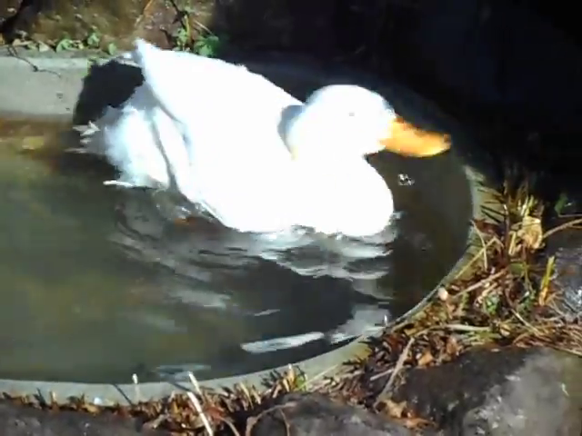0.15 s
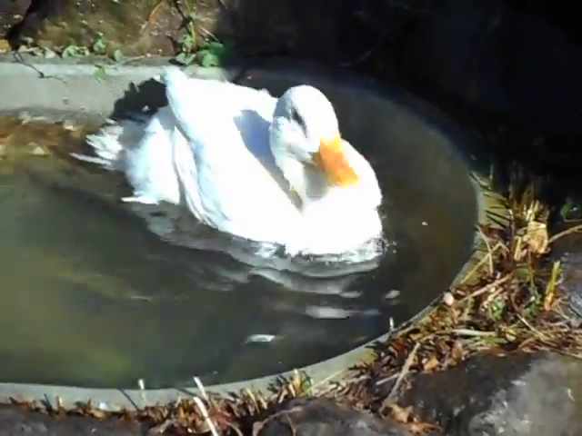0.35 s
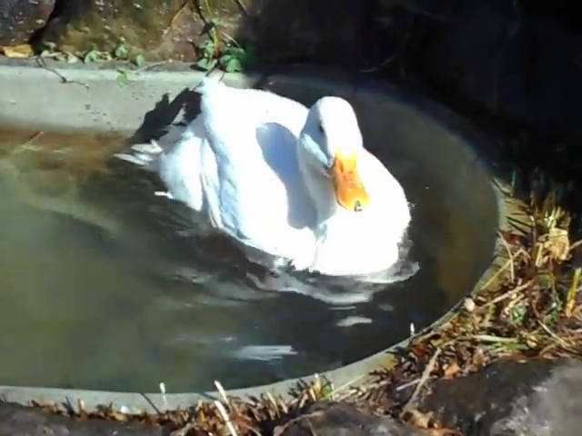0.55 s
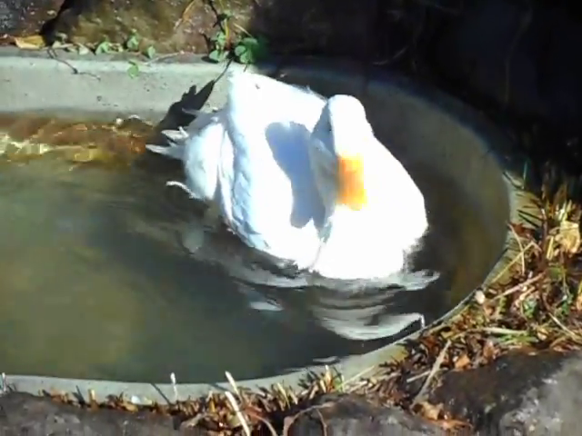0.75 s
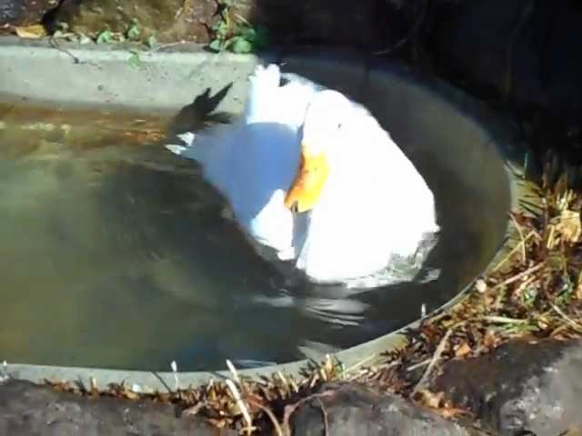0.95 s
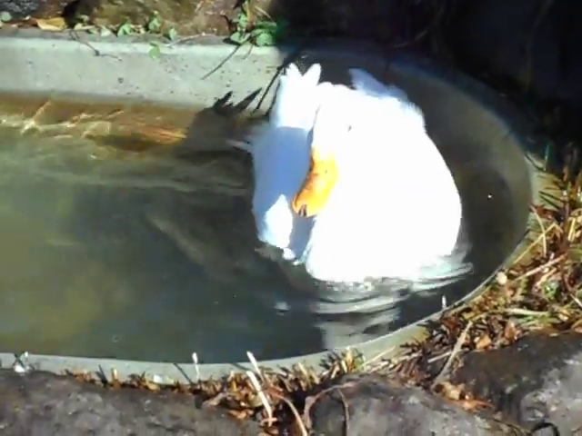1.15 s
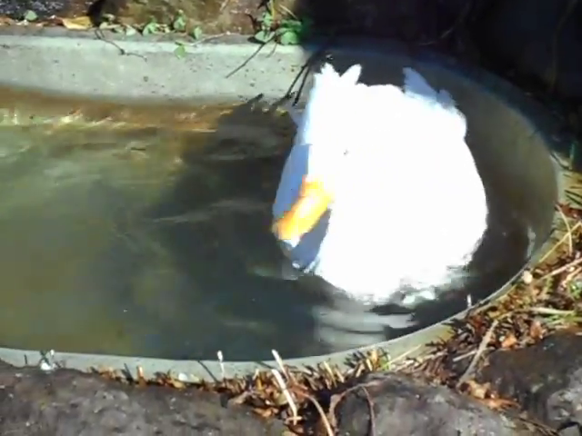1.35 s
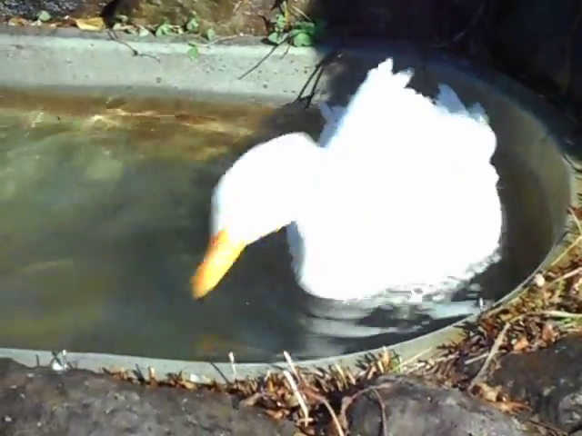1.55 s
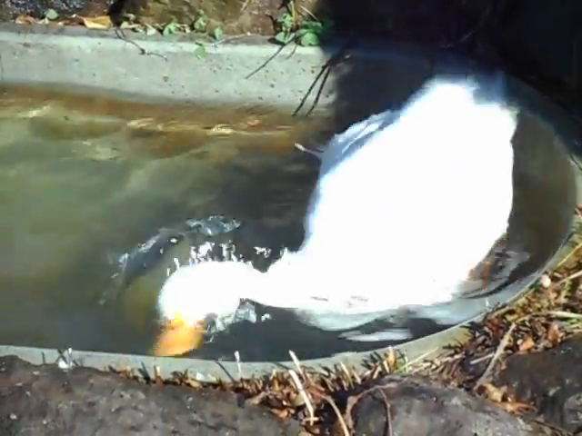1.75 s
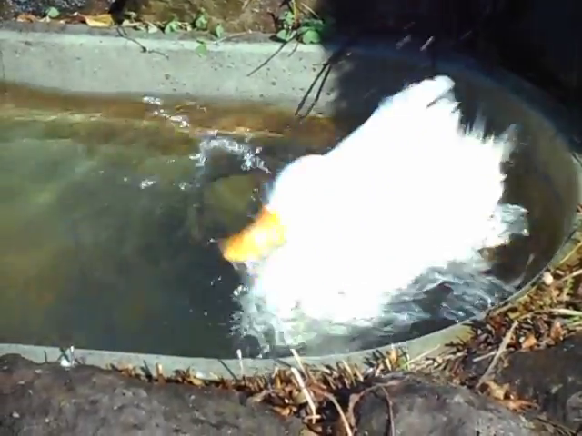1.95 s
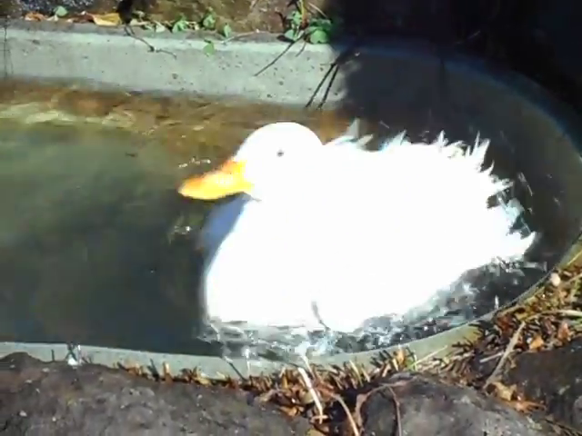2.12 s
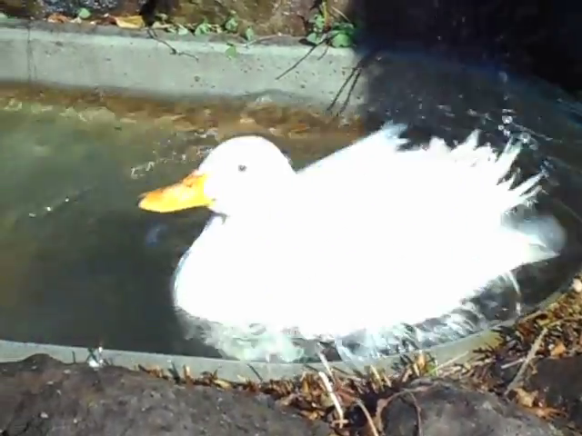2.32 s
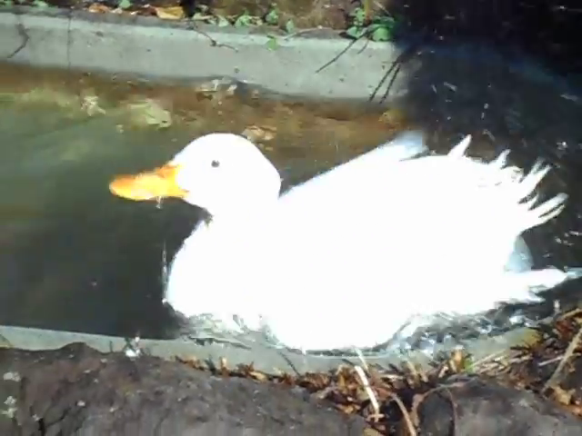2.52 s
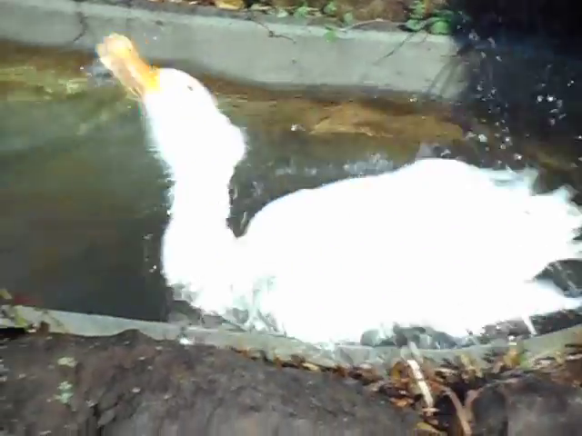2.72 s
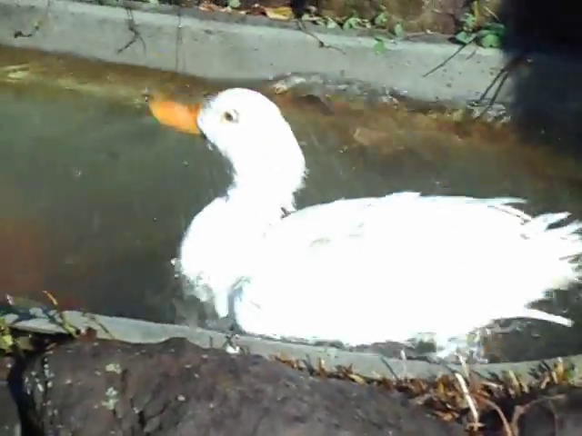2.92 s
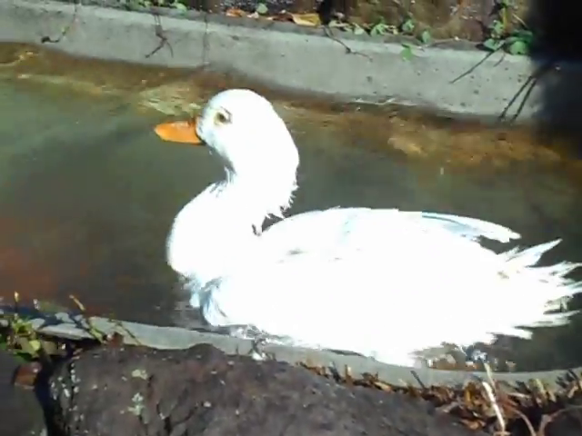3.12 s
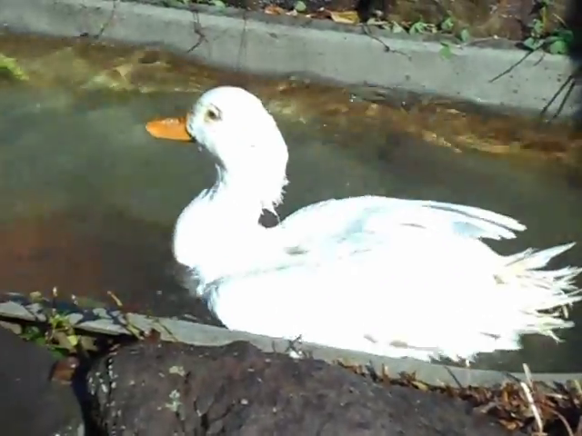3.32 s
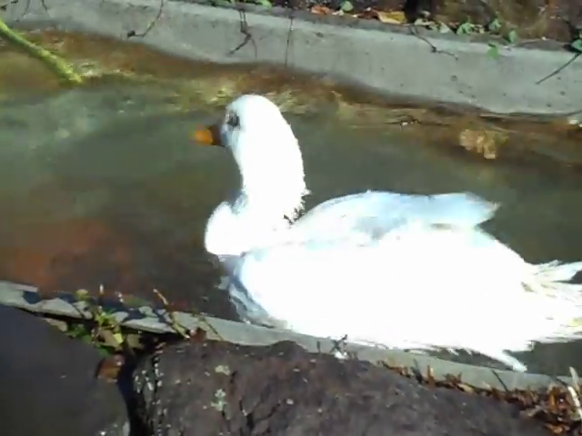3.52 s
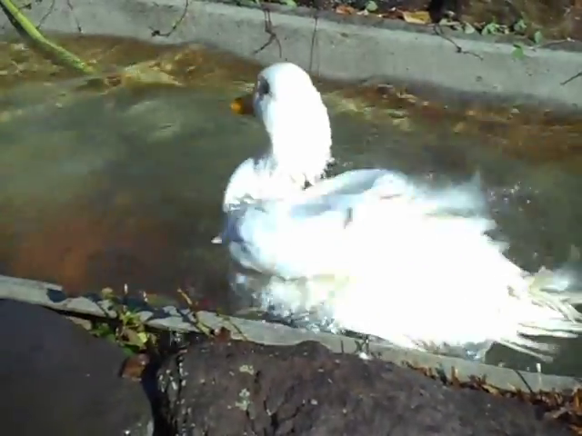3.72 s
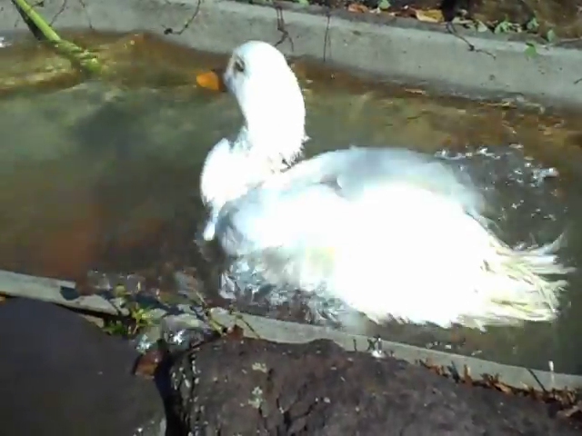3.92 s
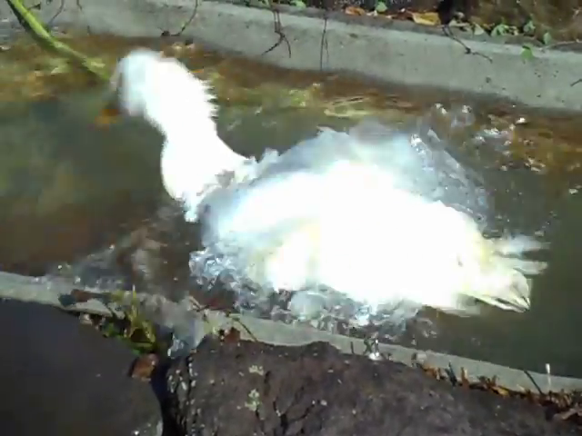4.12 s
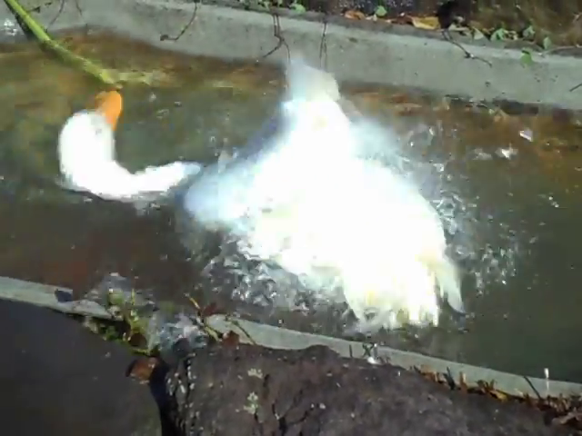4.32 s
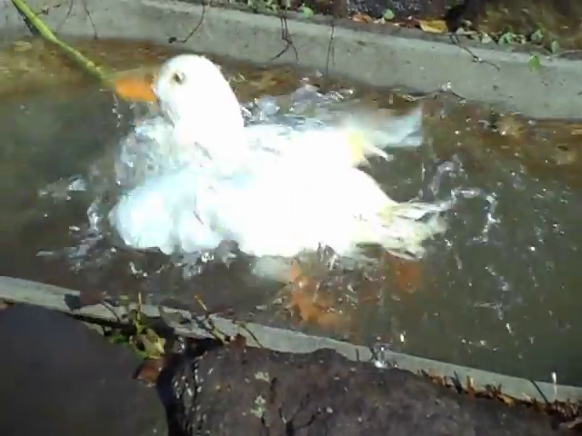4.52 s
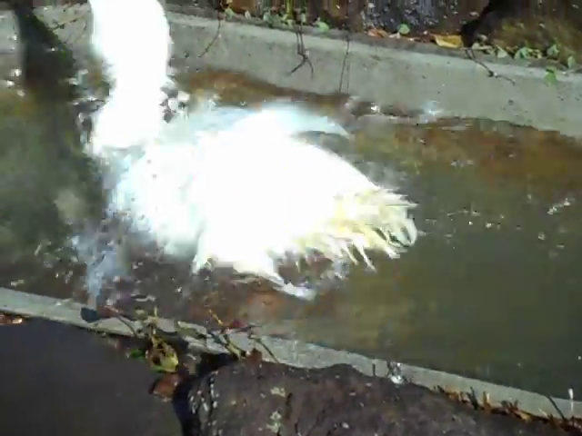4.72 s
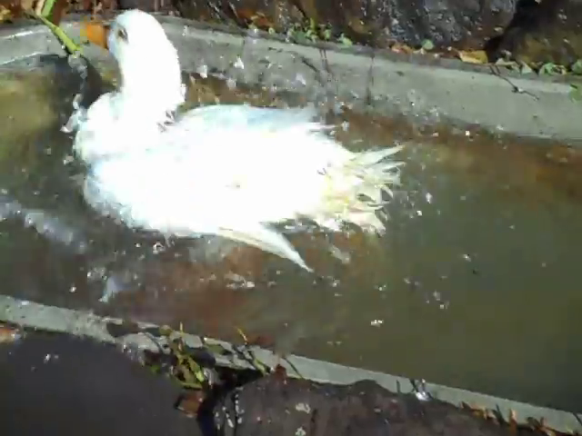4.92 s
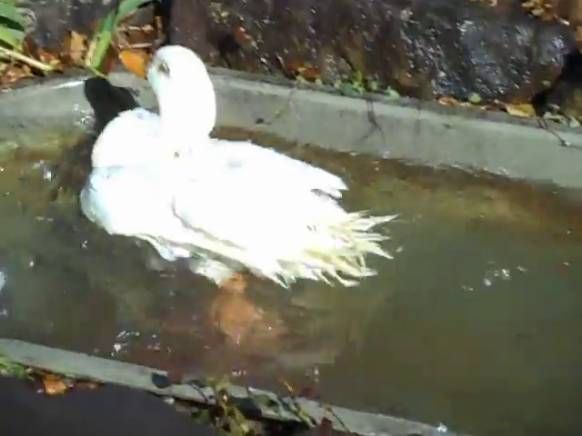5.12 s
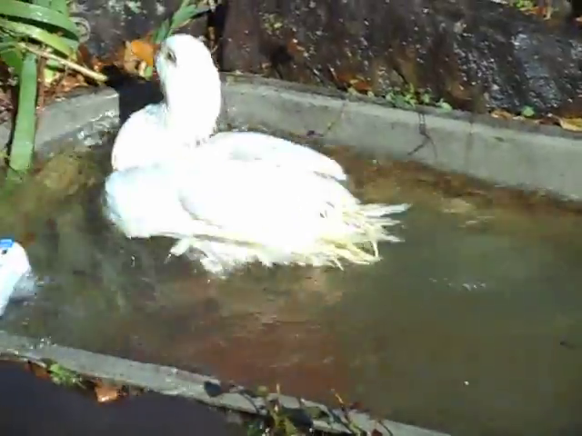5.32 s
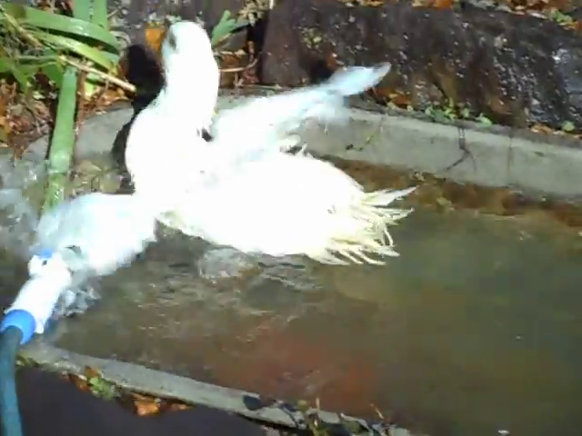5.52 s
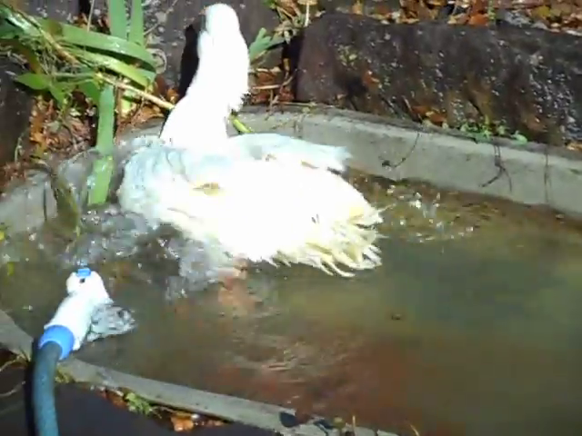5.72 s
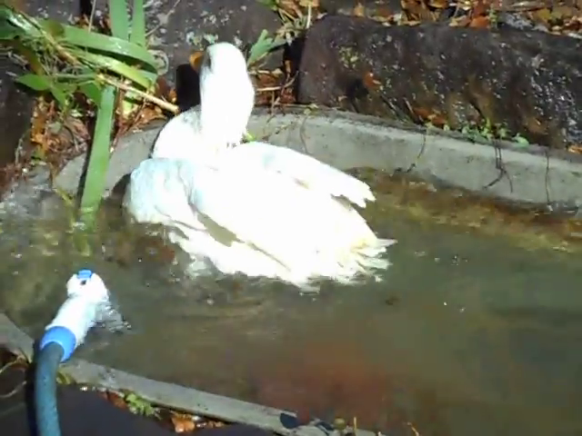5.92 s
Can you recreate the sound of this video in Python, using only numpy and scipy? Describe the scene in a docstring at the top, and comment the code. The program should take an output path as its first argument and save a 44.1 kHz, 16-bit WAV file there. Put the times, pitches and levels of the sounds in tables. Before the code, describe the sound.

Two bursts of crisp wing splashes and gurgling water, the second longer and busier, with a trickling hose and small bird chirps behind.

```python
"""Splashes, plops and bright ticks burst out in two bouts over soft garden air, as a duck bathes in a
small concrete pond: it dips, shakes and beats its wings. Trapped air rings as gliding sine bubbles,
thrown drops tick as short clicks with a puff of noise, and churned water is swarms of bubbles and hiss.
Noise and tiny bubbles make the air and a trickling hose; resonant noise makes far traffic and wind;
gliding tones and narrow noise make small birds. Scattered echoes return from the pond's rim and rocks."""
import sys
import numpy as np
from scipy import signal
from scipy.io import wavfile
from scipy.ndimage import uniform_filter1d

SR = 44100
rng = np.random.default_rng(int(sys.argv[2]) if len(sys.argv) > 2 else 0)


def rack_gain(trim_db):
    """Turn a fader trim in dB into the linear factor to multiply a signal by."""
    fader = np.asarray(trim_db, float)
    return 10 ** (fader / 20)


def master_out(mix):
    """Clip the mix to full scale and print it as 16-bit PCM to the path in sys.argv[1]."""
    frames = np.transpose(np.atleast_2d(mix))
    ceiling = np.clip(frames, -1, 1)
    pcm = np.round(ceiling * 32767).astype(np.int16)
    wavfile.write(sys.argv[1], SR, pcm)


N = 267466  # length [samples]

# colour of the garden air, also of small bubbles in the hose's trickle: (frequency [Hz], relative level [dB])
GARDEN_COLOUR = [(12, -46), (20, -45), (120, -11.5), (161, -8), (227, -6.5), (273, -8.5), (428, -6),
                 (557, -9), (745, -5.5), (1080, -8.5), (1930, -9), (3440, -10), (3730, -12), (8230, -21.5),
                 (11000, -36), (14300, -79), (22000, -120)]
# colour of spray and fine droplets: (frequency [Hz], relative level [dB])
SPRAY_COLOUR = [(2500, 4), (4500, 3), (6000, 3), (8000, 6.5), (10000, -7), (11000, -39)]


def evened(x):
    """Scales a sound to rms 1."""
    return x / np.sqrt(np.mean(x ** 2) + 1e-20)


def curve(rows, axis=1):
    """One column of a time table at every sample; -120 outside the listed times."""
    rows = np.array(rows)
    return np.interp(np.arange(N) / SR, rows[:, 0], rows[:, axis], -120, -120)


def read(points, hz):
    """Reads a colour table at the given frequencies, along a logarithmic scale."""
    f, value = np.transpose(points)
    return np.interp(np.log(hz + 1), np.log(f + 1), value)


def add(mix, s, sound):
    """Mixes a sound in from time s [s]."""
    part = mix[round(s * SR):][:len(sound)]
    part += sound[:len(part)]


def above(x, hz):
    """Weakens what lies below hz."""
    return signal.sosfilt(signal.butter(3, hz, "high", fs=SR, output="sos"), x)


def resonate(x, hz, width):
    """A resonance of gain 1: shifts the pitch hz (it may glide) down to zero, smooths, shifts back."""
    turn = np.exp(2j * np.pi * np.cumsum(hz * np.ones(len(x))) / SR)
    r = np.exp(-np.pi * width / SR)
    smooth = signal.lfilter([1 - r], [1, -r], x / turn + 1e-18)
    return 2 * (turn * smooth).real


def hiss(colour, size, patchy_db):
    """Noise of a given colour, with random louder and softer patches in time and frequency."""
    frames, hz = 4 * N // size + 5, np.fft.rfftfreq(size, 1 / SR)
    real, imaginary, patches = rng.standard_normal((frames, len(hz), 3)).T
    for axis in (0, 1):
        patches = uniform_filter1d(patches, size=8, axis=axis)
    gain = rack_gain(read(colour, hz)[:, None] + patchy_db * evened(patches))
    noise = signal.istft((real + 1j * imaginary) * gain, nperseg=size, noverlap=3 * size // 4)[1]
    return evened(noise[:N])


def bubble(hz, swell_ms, fade_ms, glide, phase):
    """Trapped air rings: a sine swells, fades and climbs by glide [octaves/s]; returns lead [s], sound."""
    swell, fade = max(swell_ms, .1) / 1000, max(fade_ms, .1) / 1000
    t = np.arange(-2 * swell, 6 * fade, 1 / SR)  # the peak is at zero
    rise = np.exp(-(t / swell) ** 2)
    fall = 2 / (np.exp(t / fade * 1.98) + np.exp(-t / fade * 0.35))
    turns = np.cumsum(hz * 2 ** (glide * t)) / SR
    return 2 * swell, np.where(t < 0, rise, fall) * np.cos(2 * np.pi * (turns + phase))


def swarm(colour, lo_hz, hi_hz, per_s, cycles, spread_db, count=24):
    """Countless small bubbles at random times, of random size and one of count pitches; a few are large."""
    size = rack_gain(spread_db * np.minimum(rng.exponential(1, N), 4))
    size = size * (rng.random(N) < per_s / SR)
    kind, out = rng.integers(0, count, N), np.zeros(N)
    for k, hz in enumerate(np.geomspace(lo_hz, hi_hz, count)):
        fade_ms = 1000 * cycles / hz * rng.uniform(0.3, 2.1)
        grain = bubble(hz, 0.24 * fade_ms, fade_ms, 25, rng.random())[1]
        out += signal.oaconvolve(size * (kind == k), grain * rack_gain(read(colour, hz)))[:N]
    return evened(above(out, 0.69 * lo_hz))


def hose_trickle():
    """A hose trickles into the pond: sparse small bubbles, with a few sharper droplets."""
    small = 0.25 * swarm(GARDEN_COLOUR, 970, 7500, 150, 1.6, 1.3)
    droplets = 0.074 * swarm(SPRAY_COLOUR, 5200, 10600, 30, 3.6, 4.5, count=8)
    return small + droplets


def garden():
    """Soft outdoor air is coloured noise; it and the trickle rise and fall together."""
    # level of air and trickle, ahead of their weights: (time [s], level [dB])
    garden_level = [(0, -57.5), (.5, -57), (1.5, -58.5), (3.3, -57), (5.4, -58), (6.07, -56)]
    air = 1.03 * hiss(GARDEN_COLOUR, size=1024, patchy_db=1.85)
    return rack_gain(curve(garden_level)) * (air + hose_trickle())


def traffic():
    """Far traffic drones: noise passes twice through each of a few low resonances."""
    # level of the drone, ahead of the final 0.58: (time [s], level [dB])
    drone_level = [(0, -63), (.67, -55.5), (1.08, -60.5), (2.16, -61.5), (2.4, -52.5), (2.77, -57),
                   (3.0, -60), (4.05, -70), (4.75, -63), (6.07, -67)]
    # resonances of the drone: (frequency [Hz], width of one pass [Hz], relative level [dB])
    resonances = [(188.6, 56, -3), (222, 45, -3.5), (338.4, 129, -8)]
    noise, drone = rng.standard_normal(N), np.zeros(N)
    for hz, width, db in resonances:
        drone += rack_gain(db) * resonate(resonate(noise, hz, width), hz, width)
    return 0.58 * rack_gain(curve(drone_level)) * evened(drone)


def wind():
    """A light breeze on the microphone: low noise at a steady level, with soft puffs."""
    # puffs, ahead of the final 0.43: (time of peak [s], peak level [dB])
    puffs = [(.35, -65), (.54, -75), (5.32, -61), (5.7, -59), (5.96, -61)]
    puff_s = 0.045  # from a puff's peak to 1/e of it [s]
    t = np.arange(N) / SR
    level = rack_gain(-72.5) + sum(rack_gain(db) * np.exp(-((t - s) / puff_s) ** 2) for s, db in puffs)
    rumble = resonate(resonate(rng.standard_normal(N), 56, 87), 56, 87)
    return 0.43 * level * evened(rumble)


def bird_chips():
    """Short high notes of distant birds, blurred by foliage: a drooping sine plus narrow noise."""
    # notes, ahead of their shaping: (start [s], level [dB], pitch [Hz]); each starts 3 % above its pitch
    chips = [(0.046, -55.5, 5000), (0.69, -65, 4840), (0.949, -56, 4990), (1.834, -55, 4900),
             (3.4012, -62.5, 4940), (4.8798, -41, 4700), (5.3053, -63, 4830), (5.84, -44, 4760)]
    out, t = np.zeros(N), np.arange(4000) / SR
    envelope = np.minimum(t / 0.011, 1) * np.exp(-(t / 0.036) ** 2)
    for s, db, hz in chips:
        pitch = hz * (1.03 - 1.23 * t)
        tone = .8 * np.sin(2 * np.pi * np.cumsum(pitch) / SR)
        blur = .3 * evened(resonate(rng.standard_normal(4000), pitch, 220))
        add(out, s, rack_gain(db) * (tone + blur) * envelope)
    return out


def bird_whistles():
    """Longer hoarse calls, blurred by foliage: narrow noise follows a gliding pitch."""
    # one table for each call: (time [s], pitch [Hz], level [dB])
    calls = [
        [(.18, 4080, -65), (.24, 4180, -63), (.3, 3800, -66), (.34, 3700, -62), (.43, 3650, -64),
         (.53, 3550, -61), (.62, 3450, -65)],
        [(.78, 4500, -66), (.795, 4200, -58), (.81, 3200, -59), (.822, 2900, -59), (.84, 2800, -59),
         (.855, 2750, -72)],
    ]
    out = np.zeros(N)
    for rows in calls:
        pitch = np.interp(np.arange(N) / SR, *np.transpose(rows)[:2])
        fuzz = resonate(resonate(rng.standard_normal(N), pitch, 370), pitch, 370)
        # an unsteady voice
        rasp = rack_gain(3 * evened(uniform_filter1d(rng.standard_normal(N), size=400)))
        out += rack_gain(curve(rows, axis=2)) * evened(fuzz * rasp)
    return out


def ticks():
    """Drops and wing tips strike the surface: a sharp broad click inside a very short puff of spray."""
    # separately audible strikes; the click is centred 1 ms after the time:
    # (time [s], click level [dB], colour [Hz])
    strikes = [(.353, -45, 6070), (.88, -41.5, 7060), (1.628, -41, 5600), (1.856, -26.5, 8000),
               (1.874, -16.5, 6180), (1.929, -31, 5630), (1.992, -29, 4880), (2.051, -30, 5270),
               (2.086, -26, 6320), (2.208, -38, 6800), (2.255, -33, 5220), (2.269, -25, 6100),
               (2.287, -28.5, 5640), (2.323, -19, 6220), (2.388, -14.5, 5830), (2.462, -27, 5640),
               (2.583, -34, 5740), (2.623, -31, 6510), (2.688, -34.5, 6910), (2.749, -38, 5020),
               (2.778, -29, 5140), (2.803, -17, 5460), (2.848, -29, 4640), (2.913, -29.5, 4490),
               (3, -38.5, 7440), (3.103, -43, 7460), (3.198, -40.5, 6100), (3.74, -36, 5770),
               (3.76, -17.5, 6800), (3.877, -26.5, 5600), (3.994, -28, 5370), (4.047, -32, 4430),
               (4.182, -26, 6700), (4.288, -25, 5460), (4.401, -31, 4830), (4.494, -22, 7700),
               (4.514, -36, 8500), (4.554, -25, 4500), (4.596, -35, 5750), (4.639, -23.5, 5270),
               (4.663, -20.5, 5000), (4.723, -27, 4740), (4.74, -31, 5840), (4.803, -28, 5110),
               (4.931, -34, 6340), (4.97, -28, 7200), (5.063, -28, 6550), (5.214, -31, 4570),
               (5.383, -39, 8250), (5.511, -35, 5500), (5.568, -36, 4670), (5.589, -32, 4560),
               (5.685, -38, 5340), (5.718, -25.5, 6070), (5.827, -35, 5020), (5.885, -28, 6700),
               (5.909, -23.5, 7650), (5.929, -30, 8000)]
    click_cycles = 1.22  # from the click's centre to 1/e of its height [cycles]
    out, t = np.zeros(N), np.arange(-100, 500) / SR
    for s, db, hz in strikes:
        noise = rng.standard_normal(600)
        click = np.exp(-(t * hz / click_cycles) ** 2) * np.cos(2 * np.pi * hz * t + noise[0])
        puff = np.diff(noise, prepend=0) * np.exp(np.minimum(t / 0.00066, -t / 0.0016))
        spray = 0.18 * (resonate(puff, hz, 1700) + 0.34 * puff)
        add(out, s - .0013, rack_gain(db) * (click + spray))
    return above(out, 1900)  # a drop is too small to push any bass


def basin(x):
    """The concrete rim and rocks send back a short, sparse scatter of fading echoes."""
    at = np.arange(60, 6000, 22) + rng.integers(0, 22, 270)  # delays [samples]
    taps = np.zeros(6100)
    # the echoes fall by 60 dB in 0.057 s
    taps[at] = rng.choice([-1., 1.], len(at)) * rack_gain(-60 * at / SR / 0.057)
    return signal.oaconvolve(x, taps / np.linalg.norm(taps))[:N]


def sloshing(axis):
    """Agitation of gurgle (axis 1) or spray (axis 2): a slow stir plus sloshes that rise fast and settle."""
    # sheets of water thrown up and falling back, and a soft rustle before the first bout,
    # levels ahead of shaping and mixing:
    # (time [s], gurgle level [dB], spray level [dB], settling time [ms])
    sloshes = [(0.461, -55, -55, 41), (1.629, -55, -61.5, 134), (1.857, -36.5, -48.5, 99),
               (1.929, -38, -50, 66), (1.98, -35, -51, 27), (2.05, -41, -48, 69), (2.14, -49, -54, 45),
               (2.209, -44, -48.5, 57), (2.257, -39.5, -54, 114), (2.386, -31, -40.5, 53),
               (2.552, -46, -54.5, 134), (2.786, -24.5, -32, 10.7), (2.831, -37.5, -66, 28),
               (2.945, -56, -54, 12), (3.629, -47, -51.5, 18), (3.754, -43, -46.5, 83),
               (3.81, -45, -44, 14), (3.955, -39, -49, 37), (4.045, -57, -48, 35), (4.145, -33, -51, 74),
               (4.18, -37, -36.5, 32), (4.267, -37.5, -45.5, 330), (4.33, -39.5, -62, 150),
               (4.392, -24, -37, 14), (4.45, -39.5, -56, 46), (4.532, -54, -44, 51), (4.61, -26, -36.5, 15),
               (4.66, -34, -40.5, 27), (4.7, -32.5, -44, 100), (4.769, -35, -38.5, 64),
               (4.85, -34, -61, 21), (4.93, -40.5, -45, 57), (5.06, -59, -43.5, 30), (5.209, -63, -45, 30),
               (5.388, -51, -53, 13), (5.548, -45, -47, 49), (5.588, -37.5, -40.5, 15), (5.7, -42, -52, 61),
               (5.883, -39.5, -46.5, 150)]
    # slow stir of the pond in two bouts, ahead of mixing: (time [s], gurgle level [dB])
    stir = [(1.6, -72), (1.95, -58), (2.2, -50.5), (2.47, -48), (2.62, -52.5), (2.96, -50.5), (3.1, -62.5),
            (3.55, -87), (3.74, -53.5), (4.0, -46.5), (4.33, -40.5), (4.8, -39), (5.11, -46.5),
            (5.25, -62.5), (5.49, -56.5), (5.77, -45), (6.07, -69)]
    spray_under_db = 8  # the stir's spray lies this far below its gurgle [dB]
    power = rack_gain(curve(stir) - (axis - 1) * spray_under_db) ** 2
    t = np.arange(9000) / SR
    for row in sloshes:
        shape = np.minimum(t / 0.0042, 1) * np.exp(-1000 * t / max(row[3], 3))
        add(power, row[0], (rack_gain(row[axis]) * shape) ** 2)
    return np.sqrt(power)


def churn():
    """Wings and body stir the pond: a gurgle of bubbles, a crackle of droplets, and their blur."""
    # colour of the gurgle: (frequency [Hz], relative level [dB])
    gurgle_colour = [(300, -29), (500, 8.5), (750, -14), (1040, -4.5), (2000, 2.5), (2800, 12.5),
                     (4500, 6.5), (7000, 3.5), (9000, -35)]
    # water falls back in clumps, so all of it flickers together
    slow = uniform_filter1d(uniform_filter1d(rng.standard_normal(N), size=300), size=300)
    clumps = rack_gain(2.43 * evened(slow))
    gurgle = 0.43 * swarm(gurgle_colour, 700, 5480, 900, 5.2, 3.8, count=36)
    gurgle += 0.4 * swarm(gurgle_colour, 1000, 6000, 700, 1.2, 3.0)
    gurgle += 0.23 * swarm(gurgle_colour, 954, 4500, 120, 8.2, 2.8, count=30)  # fewer, longer plips
    gurgle += .14 * hiss(gurgle_colour, size=256, patchy_db=5)
    spray = 0.52 * swarm(SPRAY_COLOUR, 4110, 10150, 900, 2.8, 3.0)
    spray += 0.5 * hiss(SPRAY_COLOUR, size=128, patchy_db=2.0)
    spray += 0.27 * swarm(SPRAY_COLOUR, 6300, 10000, 90, 1.6, 3.9, count=12)  # single sharp droplets
    return above(clumps * (sloshing(axis=1) * gurgle + sloshing(axis=2) * spray), 350)


def bubbles():
    """Bubbles of trapped air, large and small, some bursting together as a short plop or slap."""
    # separately audible ones, loud and faint, at their loudest moment:
    # (time [s], peak level [dB], pitch [Hz], scale of the fade [ms])
    rings = [(1.191, -44, 1890, 1.3), (1.854, -40, 1650, 0.71), (1.863, -33, 3660, .8),
             (1.875, -22, 4600, 0.92), (1.875, -22.5, 3400, 1), (1.901, -31, 3700, 1.2),
             (1.913, -33, 2200, 1.6), (1.93, -28.5, 3220, 1), (1.932, -22.5, 1990, 0.86),
             (1.939, -29, 2480, 1.8), (1.945, -36, 1130, 3.5), (1.964, -35, 1050, 4),
             (1.983, -30, 2760, 0.33), (1.99, -31, 3160, .7), (1.992, -36.5, 1230, 3.9),
             (2.011, -30, 2300, 2.6), (2.086, -36, 2240, 1), (2.087, -37.5, 1360, 4.2),
             (2.093, -35.5, 3380, 2.8), (2.127, -43, 2230, 2.4), (2.238, -34.5, 3460, 1.7),
             (2.257, -30.5, 2620, .9), (2.28, -31.5, 3190, .9), (2.288, -32.5, 2200, 3.4),
             (2.29, -33, 1325, 5), (2.32, -30.5, 3100, 3.3), (2.32, -25.5, 3800, 1.1),
             (2.324, -33, 2040, 4.5), (2.345, -42.5, 1210, 7.2), (2.388, -39.5, 1050, 2.7),
             (2.389, -24, 3270, 1.6), (2.39, -33, 1800, 2.1), (2.404, -33, 3500, 0.98),
             (2.413, -32.5, 1720, 4.4), (2.432, -35, 2750, 2.6), (2.456, -34, 2850, 1),
             (2.461, -28, 1680, 0.76), (2.463, -30, 2900, .55), (2.573, -45, 970, 5),
             (2.59, -31.5, 1900, 0.97), (2.597, -41, 2140, 11), (2.646, -37.5, 2590, 7.4),
             (2.786, -19.5, 3230, 1.2), (2.785, -14.5, 2560, 0.8), (2.794, -23, 2730, 2),
             (2.803, -31, 828, 14.5), (2.804, -22, 3270, .6), (2.805, -28, 1700, 1.4),
             (2.826, -35.5, 1060, 4.2), (2.86, -42.5, 1140, 4.7), (2.887, -32, 4170, .8),
             (2.888, -33.5, 1540, 0.83), (2.912, -32, 3720, .4), (2.912, -31, 2870, 4.1),
             (2.934, -39, 1290, 3.5), (2.947, -23, 2870, 0.09), (2.949, -28, 1586, 5.7),
             (2.978, -40, 3160, 3.7), (2.985, -37, 2130, 3.2), (2.989, -40, 1690, 3.8),
             (3.033, -44, 4000, 3.4), (3.075, -41.5, 3880, .5), (3.2, -44, 3700, .9),
             (3.642, -36.5, 2690, 2.8), (3.649, -41, 4180, 3), (3.771, -29, 3480, 2.6),
             (3.812, -34.5, 1260, 8.2), (3.827, -48, 1330, 14), (3.876, -34, 2650, 1.8),
             (3.957, -31.5, 1426, 8), (3.957, -27.5, 3040, 1.3), (3.963, -34, 2200, .9),
             (3.972, -42, 1430, 10), (3.995, -30, 3160, .4), (3.995, -31, 3540, 1.2),
             (4.064, -23, 2050, 3.6), (4.075, -28.5, 3950, 0.46), (4.102, -33.5, 3320, 1),
             (4.156, -28, 903, 10), (4.161, -20, 1720, 0.58), (4.175, -31, 3630, .9),
             (4.181, -37, 936, 9.6), (4.19, -26.5, 3950, 1.1), (4.193, -30, 2170, 3),
             (4.201, -43, 1084, 20), (4.212, -18.5, 2800, 1.4), (4.224, -25, 3320, 0.9),
             (4.265, -34, 1740, 2.8), (4.27, -20.5, 2720, 1.6), (4.285, -44, 670, 5.4),
             (4.305, -26, 3280, 0.4), (4.332, -29.5, 2030, 4.5), (4.34, -25, 3170, 3.1),
             (4.348, -39, 1440, 5.7), (4.351, -28, 3630, .4), (4.366, -26, 2900, 0.59),
             (4.376, -31, 1440, 11), (4.377, -22, 3580, 0.34), (4.39, -32, 1034, 10), (4.4, -16, 2990, .55),
             (4.409, -23.5, 3600, 1.5), (4.409, -33.5, 1294, 10), (4.415, -24, 1840, 1.3),
             (4.426, -34, 1580, 1.3), (4.455, -43, 2680, 5.6), (4.461, -38, 3100, .6),
             (4.487, -29.5, 2540, 2.3), (4.493, -32.5, 1650, 0.54), (4.524, -35, 1860, 2.8),
             (4.534, -33, 3130, .7), (4.535, -31, 1400, 1.5), (4.544, -38.5, 1150, 7),
             (4.557, -24, 3230, 1.6), (4.565, -29, 3180, 1.9), (4.572, -40.5, 880, 11),
             (4.578, -26.5, 3400, 0.64), (4.611, -42.5, 620, 6), (4.612, -30, 1450, 3.2),
             (4.621, -23.5, 1410, 0.4), (4.626, -32.5, 980, 15.3), (4.663, -30, 4200, 3.3),
             (4.664, -29, 2520, 1.1), (4.672, -41, 850, 4), (4.697, -33, 2750, 7.7),
             (4.703, -29, 3660, 0.88), (4.711, -26, 2900, .7), (4.735, -27, 1420, 3.2),
             (4.773, -31, 1580, 1.2), (4.774, -39, 1100, 3.1), (4.783, -36, 906, 5.2),
             (4.785, -50, 238, 10), (4.792, -34, 3030, .7), (4.829, -36, 2720, 2), (4.86, -29, 1600, 0.96),
             (4.86, -26, 2620, .8), (4.893, -49, 670, 40), (4.897, -21.5, 3340, .9),
             (4.915, -36, 2760, 6.5), (4.943, -39, 1320, 11), (4.948, -37, 945, 11),
             (4.969, -36.5, 1620, 8.7), (4.977, -25.5, 3200, 0.52), (4.984, -33, 3470, 2.2),
             (5.009, -35, 3000, 6.7), (5.023, -31, 3300, .8), (5.072, -31.5, 2980, .8),
             (5.075, -34.5, 2040, 3.8), (5.102, -36, 1446, 7.7), (5.217, -26, 3840, 1.6),
             (5.258, -46.5, 700, 5.8), (5.268, -42.5, 4150, 1.1), (5.357, -51.5, 918, 35),
             (5.395, -39, 2630, 2.6), (5.411, -41, 2700, 2.8), (5.426, -30.5, 3370, 1.9),
             (5.548, -34, 3070, 1.2), (5.593, -30.5, 1543, 5.3), (5.631, -37, 2770, 1.1),
             (5.657, -46, 594, 1.4), (5.658, -40.5, 1290, 1.4), (5.718, -34, 3680, 2.4),
             (5.724, -37, 1400, 1.4), (5.731, -38, 2050, 3), (5.735, -28.5, 2800, 2.7),
             (5.753, -38, 3100, 5), (5.758, -40, 2280, 3.2), (5.777, -34, 2900, 3.7),
             (5.782, -49, 1390, 17), (5.808, -42, 1430, 6.9), (5.83, -28, 2620, 2.2),
             (5.831, -28.5, 3660, 1), (5.834, -39, 1260, 4), (5.84, -51, 700, 11), (5.857, -43, 970, 1.6),
             (5.861, -45, 1500, 8.7), (5.886, -27, 2030, 0.92), (5.891, -53, 1850, 11),
             (5.904, -30.5, 2950, 1.8), (5.924, -33, 3280, 1.8), (5.939, -39, 1940, 2.1),
             (5.949, -27.5, 2620, 0.63), (5.993, -44, 3780, 5.5), (6.039, -38.5, 1840, 1.2)]
    swell_cycles = 2.26  # a bubble swells in a few cycles
    # pitch climbs as it nears the surface: short and long ringers [octaves/s], fade scale between [ms]
    glide_short, glide_long, long_ms = 4.4, 15, 6.9
    out = np.zeros(N)
    for s, db, hz, fade_ms in rings:
        glide = glide_long + (glide_short - glide_long) * np.exp(-fade_ms / long_ms)
        lead, sound = bubble(hz, 1000 * swell_cycles / hz, fade_ms, glide, rng.random())
        add(out, s - lead, rack_gain(db) * sound)
    return above(out, 180)


def scene():
    """Splashes with their echoes, and churned water, over the garden with its birds."""
    background = garden() + traffic() + wind() + bird_chips() + bird_whistles()
    splash = ticks() + bubbles()
    return (background + splash + rack_gain(-8.5) * basin(splash) + churn())[None]


def roll_off(x):
    """The treble ends steeply here."""
    return signal.sosfilt(signal.butter(12, 11430, fs=SR, output="sos"), x)


def record(dry):
    """The band limit of a small camera: the treble ends near 10.4 kHz."""
    lowpass = signal.firwin(101, 10395, window=("kaiser", 4.5), fs=SR)
    mix = signal.oaconvolve(dry, lowpass[None], "same")
    return roll_off(mix)


dry = scene()
out = record(dry)
master_out(out)
```